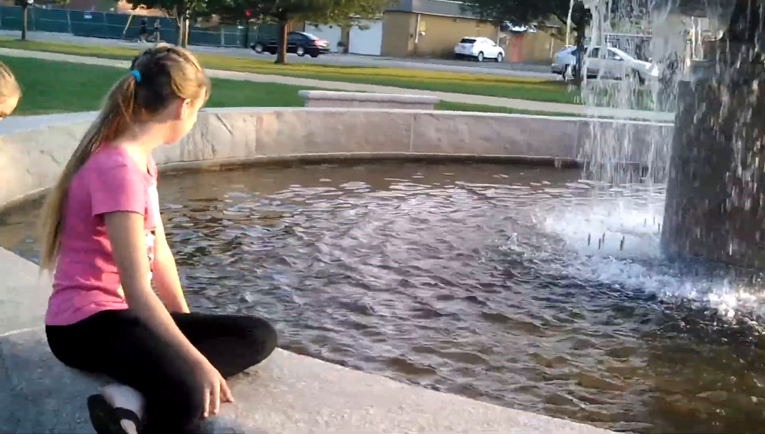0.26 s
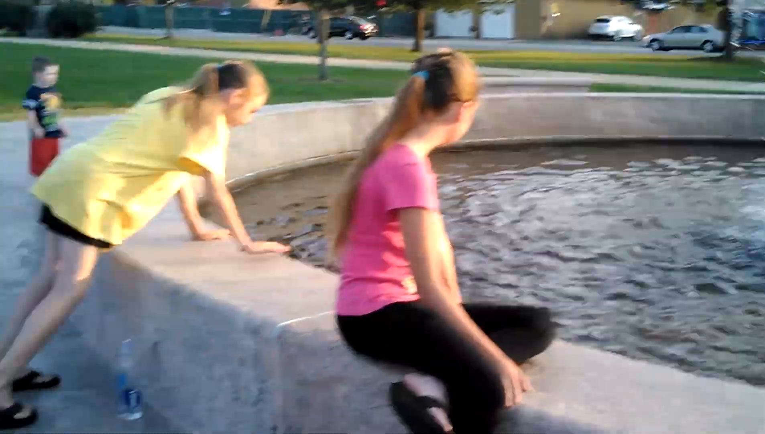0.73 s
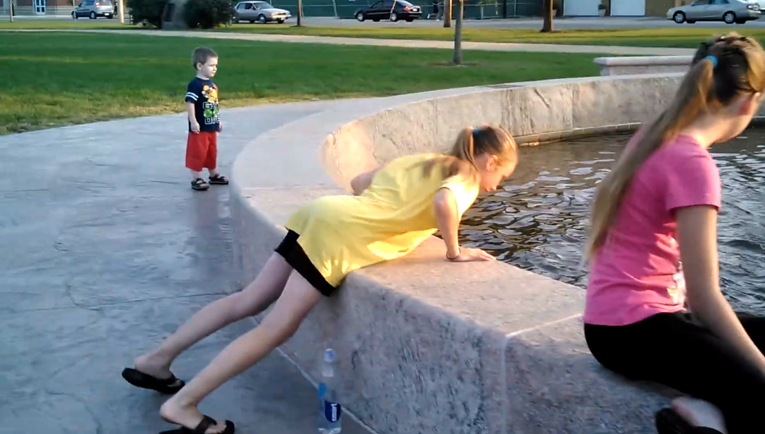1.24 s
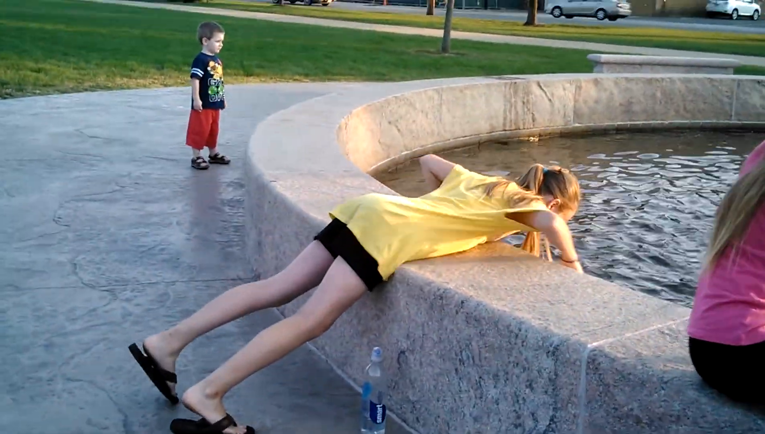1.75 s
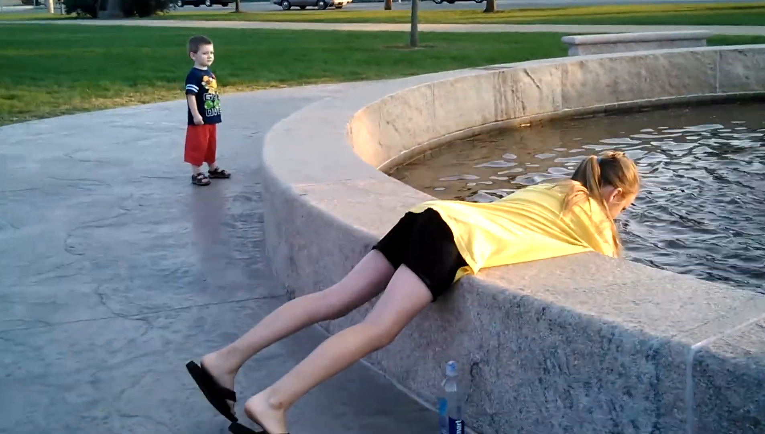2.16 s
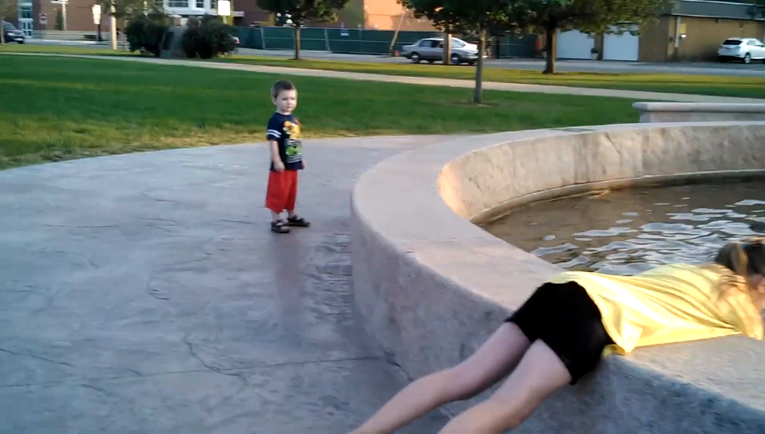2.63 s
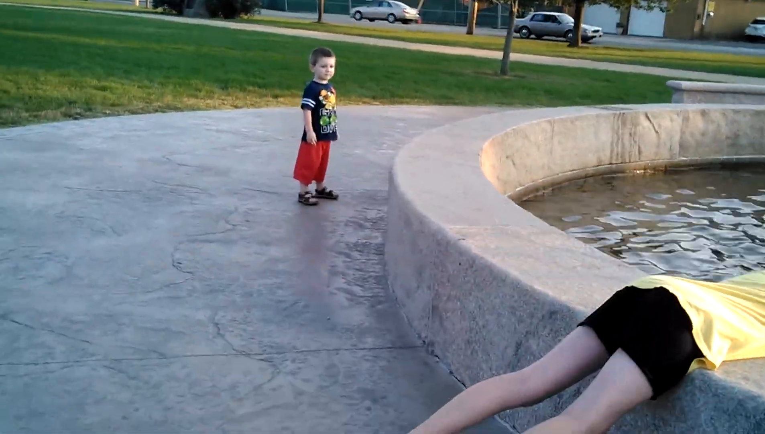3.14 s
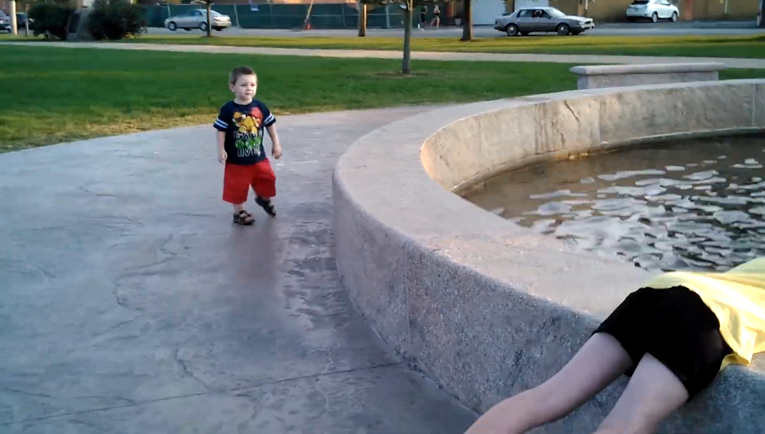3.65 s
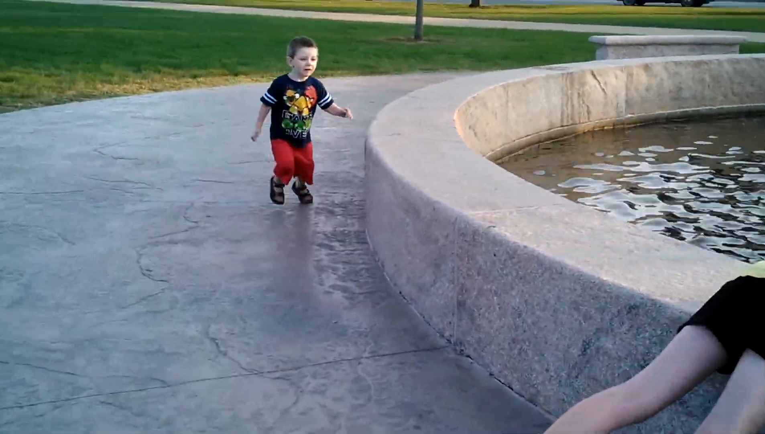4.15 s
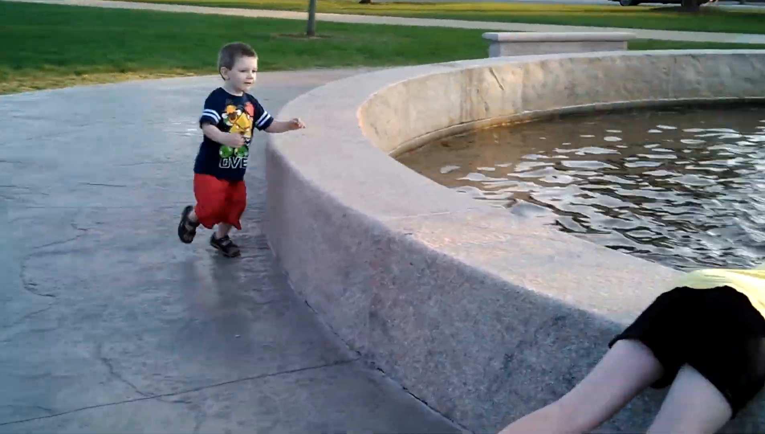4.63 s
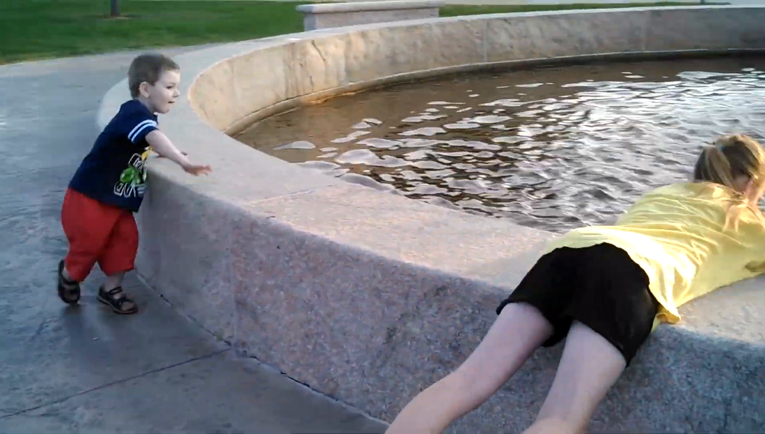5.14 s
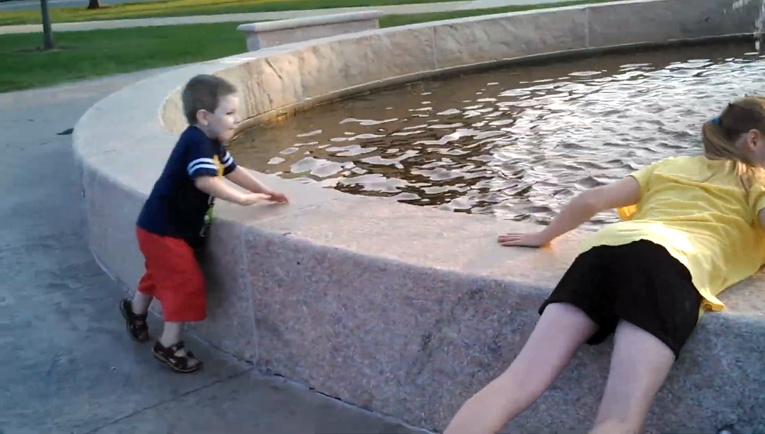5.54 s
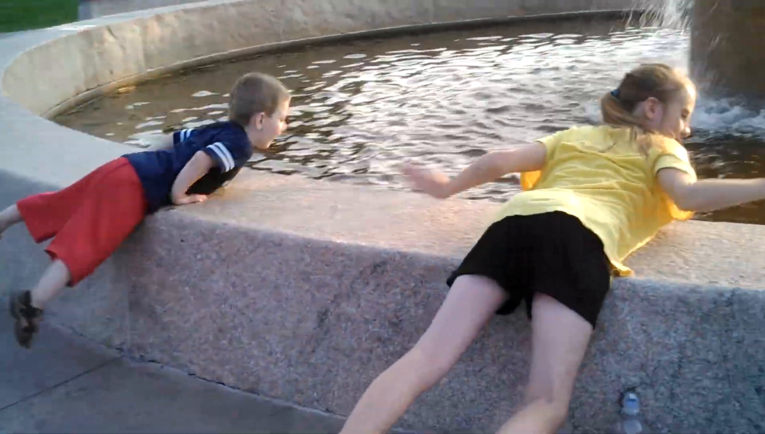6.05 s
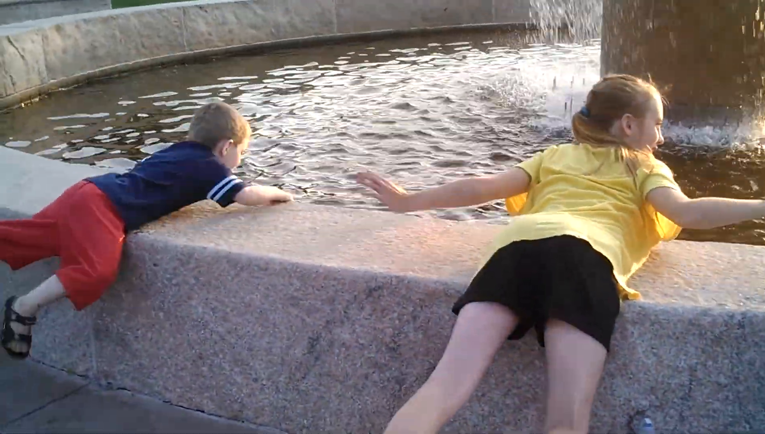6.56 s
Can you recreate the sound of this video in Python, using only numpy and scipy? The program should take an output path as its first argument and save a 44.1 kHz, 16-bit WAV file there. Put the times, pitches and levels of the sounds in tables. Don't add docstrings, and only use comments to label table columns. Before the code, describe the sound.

A continuous park fountain, heard outdoors from a few metres through a small handheld microphone. From 0 s, sheets of water fall into a stone basin: dense, bright spray hiss concentrated around 6 kHz, fine mist above and mid-range bubbling gurgle below, with small surges and split-second dips, notably near 1.9 s. Close drops slap and plop at 0.1, 0.2, 0.6 and 0.8 s, then irregularly. Low wind thumps are light at first, build from 2.1 s, hit hardest around 2.7-2.9 s and continue in lumps until about 4.6 s, while the water is slightly quieter. From 5 s the microphone turns towards the fountain; splashing comes forward and its treble shifts. A hard tick on stone comes at 5.5 s, then a quick pair at 6.2 s, the second louder. Wet drops and soft wind return near 6.5 s; water runs through the end at 6.8 s. Dry, almost mono, with slightly grainy, wide treble.

```python
import sys
import numpy as np
from scipy import signal
from scipy.fft import rfft, irfft, next_fast_len
from scipy.io import wavfile
from scipy.ndimage import uniform_filter1d, minimum_filter1d, map_coordinates

SR = 44100
rng = np.random.default_rng(int(sys.argv[2]) if len(sys.argv) > 2 else 0)


def magnitude_from_level(level_db):
    exponent = np.asarray(level_db, float) / 20
    return 10 ** exponent


def unload_wav(signal):
    wavfile.write(
        sys.argv[1],
        SR,
        np.round(np.clip(np.atleast_2d(signal).T, -1, 1) * 32767).astype(np.int16),
    )


N = 299439

# start_s, facing_0_to_1
FACING = [(0, 0.22), (2, 0.15), (4.5, 0.11), (4.9, 0.2), (5.3, 0.48), (5.7, 0.37), (6, 0.48), (6.79, 0.58)]


def unit(x):
    return x / np.sqrt(np.mean(x ** 2) + 1e-20)


def along(points, hz):
    point_hz, value = np.transpose(points)
    return np.interp(np.log(hz + 1), np.log(point_hz + 1), value)


def curves(rows):
    start_s, *columns = np.transpose(rows)
    t_s = np.arange(N) / SR
    return [np.interp(t_s, start_s, column) for column in columns]


def wobble(rate_hz):
    knots = rng.standard_normal(int(N * 200 / SR) + 4)
    return map_coordinates(knots, [np.arange(N) * min(rate_hz, 200) / SR])


def coloured(x, spectrum):
    size = next_fast_len(N + 8192)
    gain = magnitude_from_level(along(spectrum, np.fft.rfftfreq(size, 1 / SR)))
    return unit(irfft(rfft(x, size) * gain, size)[:N])


def turned(x, spectra):
    facing = np.clip(curves(FACING)[0], 0, 1)
    return (1 - facing) * coloured(x, spectra[0]) + facing * coloured(x, spectra[1])


def evened(x, size):
    power = np.abs(uniform_filter1d(x ** 2, size=size))
    return unit(x / (power + 0.05) ** 0.31)


def patchy(patchy_db):
    z = signal.stft(rng.standard_normal(N), nperseg=512)[2]
    field = uniform_filter1d(rng.standard_normal(z.shape), size=6, axis=0)
    field = uniform_filter1d(field, size=8, axis=1)
    return unit(signal.istft(z * magnitude_from_level(patchy_db * unit(field)), nperseg=512)[1][:N])


def bubbles(count, hz, spread, cycles, size_db):
    when = rng.random(count)
    size = np.minimum(rng.exponential(size=count), 6)
    pitch_hz = np.clip(hz * np.exp(spread * rng.standard_normal(count)), 300, 16000)[:, None]
    turns = pitch_hz * np.arange(400) / SR
    rings = np.sin(2 * np.pi * turns * (1 + 0.037 * turns / cycles)) * np.exp(-turns / cycles)
    rings *= magnitude_from_level(size_db * size)[:, None] * np.sqrt(pitch_hz)
    index = (when * N).astype(int)[:, None] + np.arange(400)
    return unit(np.bincount(index.ravel(), rings.ravel(), N + 400)[:N])


def drops(count, size_db):
    when = rng.random(count)
    size = rng.exponential(size=count)
    sign = rng.choice([-1, 1], count)
    return unit(np.bincount((when * N).astype(int), sign * magnitude_from_level(size_db * size), N))


def fountain():
    # start_s, fall_db, mist_drift_db
    flow = [(0, -11, -1), (.3, -12, -2.5), (.65, -11, 0), (1.05, -13, -3), (1.3, -12.5, 1),
            (1.65, -11.5, 0.5), (2.1, -12.5, 1), (2.5, -14.5, 3), (2.85, -13.5, .5), (3.1, -14.5, -3),
            (3.45, -14.5, 3.5), (3.85, -15, -1), (4.4, -13, 0), (5.0, -13, .5), (5.3, -11, -0.5),
            (5.8, -12, 1), (6.25, -13, -3), (6.79, -12.5, -1.5)]
    # middle_s, depth_db
    tears = [(.11, 3), (.26, 2), (1.14, -1), (1.53, 5), (1.8, 6), (1.9, 13), (2.46, 0), (2.53, 4),
             (2.59, 6), (2.99, 4), (3.16, 0), (3.25, 3), (3.37, 3), (3.46, 6), (4.01, 0), (5.01, 5),
             (5.57, 10.5), (5.67, 5), (5.99, 5), (6.05, 5), (6.13, 6), (6.33, 6)]
    # pitch_hz, density_db_per_hz
    gurgle_spectra = [
        [(160, -42), (280, -16), (447, -7.5), (490, -10.5), (623, -4.5), (1340, -4), (1670, -5), (2460, -1.5), (4300, -8), (5590, -17), (9460, -120)],
        [(160, -37), (280, -8.5), (974, -5), (1250, -4.5), (2150, -2.5), (3430, -10), (3620, -33), (4200, -24), (5460, -36), (9240, -120)],
    ]
    # pitch_hz, density_db_per_hz
    port_spectra = [
        [(2290, -37.5), (3900, -35), (4510, -20.5), (5540, -3.5), (6080, 3), (8200, -15), (10700, -30), (18000, -120)],
        [(2290, -74), (3900, -32), (4220, -19), (4990, -6.5), (6030, 0), (6530, -1), (7290, -20), (8200, -31), (10700, -38), (18000, -120)],
    ]
    # pitch_hz, density_db_per_hz
    mist_spectra = [
        [(4410, -18), (7500, -2), (9080, -3.5), (9810, -11.5), (10900, -31), (11900, -36), (15500, -53), (22000, -120)],
        [(4410, -25), (7500, -1.5), (8550, -4), (8940, -12), (10200, -6.5), (11900, -11.5), (15500, -42), (22000, -120)],
    ]
    # pitch_hz, density_db_per_hz
    fine_spectrum = [(10500, -40), (11700, -14), (12500, -5), (13400, 0), (14400, 0), (14800, -90)]

    fall_db, drift_db = curves(flow)
    swing_db = fall_db - fall_db.mean()
    facing = curves(FACING)[0]
    t_s = np.arange(N) / SR

    gurgle_db = -25 + 0.63 * swing_db - 4.5 * facing - 0.36 * drift_db + 0.54 * wobble(9)
    mist_db = -23 + 0.2 * swing_db - 12 * facing + 0.5 * drift_db + 1.35 * wobble(28)
    fine_db = -35 + 0.6 * swing_db + 6.5 * facing + drift_db
    spray_db = fall_db + 0.23 + 0.24 * wobble(28)
    tear_half_s, tear_share = 0.011, 0.74
    for middle_s, depth_db in tears:
        spray_db -= tear_share * depth_db * np.exp(-((t_s - middle_s) / tear_half_s) ** 2)
    surge_db = 0.17 * wobble(12) + 0.12 * wobble(35)

    impacts = drops(count=16000, size_db=2.5)
    rings = bubbles(count=7000, hz=1524, spread=0.582, cycles=3.3, size_db=2.5)
    gurgle = turned(patchy(patchy_db=1.6) + magnitude_from_level(-10.5) * rings + magnitude_from_level(-5) * impacts, gurgle_spectra)
    spray = turned(patchy(patchy_db=1.0) + magnitude_from_level(-6.5) * impacts, port_spectra)
    mist = turned(patchy(patchy_db=0.3) + impacts, mist_spectra)
    fine = coloured(patchy(patchy_db=0.0) + magnitude_from_level(-21) * impacts, fine_spectrum)

    gurgle *= magnitude_from_level(gurgle_db + 0.18 * surge_db)
    spray *= magnitude_from_level(spray_db + 0.36 * surge_db + 0.15 * wobble(25))
    mist *= magnitude_from_level(mist_db + 0.64 * surge_db + 0.81 * wobble(21.92))
    fine *= magnitude_from_level(fine_db + 0.4 * surge_db + 1.3 * wobble(30))
    return gurgle + spray + mist + fine


def wind():
    # start_s, breeze_db
    breeze = [(0, -40), (.8, -40.5), (1.3, -37), (1.9, -39.5), (2.4, -38), (2.9, -28), (3.5, -35.5),
              (4.0, -35), (4.7, -39.5), (5.3, -40), (5.8, -36), (6.2, -37), (6.79, -36.5)]
    # middle_s, length_s, slow_eddies_db, sharp_eddies_db
    gusts = [(0.037, 0.024, -30, -34.5), (.11, .04, -31, -32.5), (.43, 0.049, -37, -37),
             (0.667, 0.023, -36, -44), (0.917, .06, -33, -36.5), (1.112, .04, -31, -54),
             (1.203, 0.036, -30.5, -38), (1.587, .06, -31, -48), (2.107, 0.044, -32, -40),
             (2.189, .04, -33, -28), (2.256, 0.063, -26, -28), (2.368, 0.12, -27, -28),
             (2.46, .05, -27, -29.5), (2.558, 0.14, -28, -25.5), (2.681, 0.076, -22.5, -22),
             (2.767, 0.086, -23, -15.5), (2.87, 0.077, -28, -17), (2.955, .05, -23, -23),
             (3.12, 0.096, -31, -32), (3.24, 0.12, -29, -31.5), (3.46, 0.1, -28.5, -31.5),
             (3.6, 0.12, -27, -33.5), (3.81, 0.053, -30, -37), (3.96, 0.11, -29, -36),
             (4.065, 0.096, -22.5, -31), (4.3, .07, -27, -29), (4.398, 0.087, -25, -31.5),
             (4.58, 0.07, -30, -37.5), (6.5, 0.16, -32, -35.5), (6.74, 0.11, -28, -47)]
    # pitch_hz, density_db_per_hz
    slow_spectrum = [(15, -70), (28, -44), (38, -12), (48, -8), (70, 1.5), (110, -4.5), (170, -21.5),
                     (400, -80)]
    # pitch_hz, density_db_per_hz
    sharp_spectrum = [(60, -52), (120, 2.5), (190, -3.5), (300, -13.5), (500, -22.5), (1000, -72)]

    rise_s, tail_s = 0.013, 0.023
    breeze_db = curves(breeze)[0]
    t_s = np.arange(N) / SR
    slow_gain = magnitude_from_level(breeze_db + wobble(12))
    sharp_gain = magnitude_from_level(breeze_db - 4.5 + wobble(12))
    for middle_s, length_s, slow_db, sharp_db in gusts:
        beyond_s = np.maximum(np.abs(t_s - middle_s) - length_s / 4, 0)
        edge_s = np.where(t_s < middle_s, rise_s, tail_s) + length_s / 8
        lump = np.exp(-(beyond_s / edge_s) ** 2)
        slow_gain = np.hypot(slow_gain, magnitude_from_level(slow_db) * lump)
        sharp_gain = np.hypot(sharp_gain, magnitude_from_level(sharp_db) * lump)
    slow = evened(coloured(rng.standard_normal(N), slow_spectrum), size=2000)
    sharp = evened(coloured(rng.standard_normal(N), sharp_spectrum), size=1500)
    return magnitude_from_level(0.7 * wobble(25)) * (slow_gain * slow + sharp_gain * sharp)


def slaps():
    # start_s, peak_db, bubble_hz, bubble_db, crack_db
    near_drops = [(0.0919, -1, 1550, 2, -20), (0.1135, -3, 1350, 2, -16), (0.1983, -1, 1020, 1.5, -21),
                  (0.6074, 0, 1370, 0, -16), (0.821, -11, 1340, 7, -26), (1.2912, -14, 2420, -3, -10),
                  (1.4691, -13, 2500, 1, -10), (2.026, -6.5, 1580, 4, -21), (2.09, -8.5, 1690, -3, -9),
                  (2.183, -3.5, 2270, 2, -26), (3.104, -9.5, 2190, -1, -9), (3.536, -10, 2490, 3, -15),
                  (3.9697, -7, 3170, -7, -13), (4.371, -3.5, 1130, -7, -14), (4.4757, -14, 3100, 1, -11),
                  (4.8813, -7.5, 2210, 0, -14), (5.165, -11, 1660, -1, -13), (5.249, -2, 1690, 1, -22),
                  (6.416, -2.5, 1300, -1.5, -20), (6.5031, -6, 1640, 0, -19)]

    t_s = np.arange(2000) / SR
    out = np.zeros(N + len(t_s))
    u = (t_s - 0.0012) / 0.00007
    spike = (1 - u * u) * np.exp(-u * u / 2)
    for start_s, peak_db, bubble_hz, bubble_db, crack_db in near_drops:
        ring = np.sin(2 * np.pi * bubble_hz * t_s * (1 + 9 * t_s))
        ring *= magnitude_from_level(bubble_db - 60 * t_s / 0.0087) * (1 - np.exp(-t_s / 0.0013))
        spatter = signal.lfilter([0.45], [1, -0.6], rng.standard_normal(len(t_s)))
        spatter *= 0.52 * magnitude_from_level(-60 * t_s / 0.04)
        slap = ring + magnitude_from_level(crack_db + 10.5) * (spike + spatter)
        out[round(start_s * SR):][:len(t_s)] += magnitude_from_level(peak_db) * slap
    return out[:N]


def ticks():
    # start_s, peak_db, width_ms, ring_db, ring_hz
    contacts = [
        (5.5437, -.5, .06, -17, 3000),
        (6.1772, -5, .055, -10, 1400),
        (6.2067, 1.5, .065, -17, 650),
    ]

    t_ms = np.arange(900) / SR * 1000
    out = np.zeros(N + len(t_ms))
    after_ms = np.maximum(t_ms - 1.3, 0)
    for start_s, peak_db, width_ms, ring_db, ring_hz in contacts:
        u = (t_ms - 1.3) / width_ms
        spike = (1 - 0.5 * u * u) * np.exp(-u * u / 2)
        rebound = -0.26 * np.exp(-((u - 3) / 2) ** 2)
        ring = np.cos(2 * np.pi * ring_hz * after_ms / 1000) * (after_ms > 0)
        ring *= magnitude_from_level(ring_db - 60 * after_ms / 12)
        spatter = signal.lfilter([0.45], [1, -0.6], rng.standard_normal(len(t_ms)))
        spatter *= 0.2 * magnitude_from_level(-60 * t_ms / 18)
        tick = spike + rebound + ring + spatter
        out[round(start_s * SR):][:len(t_ms)] += magnitude_from_level(peak_db + 2) * tick
    return out[:N]


def scene():
    return np.tile(fountain() + wind() + slaps() + ticks(), (2, 1))


def noise_swap(x):
    # band_hz, share_of_frames
    swap_share = [(4359, 0.03), (5344, 0.1), (6516, 0.32), (7875, 0.56), (9375, 0.57), (10875, 0.44),
                  (12375, 0.62), (13875, 0.61)]
    edges = np.array([176, 196, 216, 240, 264, 292, *range(320, 609, 32)])

    frame = 941
    window = signal.windows.kaiser_bessel_derived(2 * frame, 4 * np.pi)
    z = signal.stft(x, window=window, nperseg=2 * frame)[2]
    fresh = signal.stft(rng.standard_normal(x.shape), window=window, nperseg=2 * frame)[2]

    luck = rng.standard_normal((len(edges), z.shape[2] + 1))
    luck = luck[1:] + luck[:-1]
    luck = unit(luck[:, 1:] - 0.15 * luck[:, :-1])

    out = np.where(np.arange(z.shape[1])[:, None] < edges[-1], z, 0)
    loud = uniform_filter1d(np.abs(z), size=13, axis=1) > magnitude_from_level(-67)
    for lo, hi, row in zip(edges, edges[1:], luck):
        share = 0.72 * along(swap_share, (lo + hi) * SR / (4 * frame))
        swap = 1 / (1 + np.exp(-1.7 * row)) < share
        band, noise = z[:, lo:hi], fresh[:, lo:hi]
        level = np.linalg.norm(band, axis=1) / (np.linalg.norm(noise, axis=1) + 1e-12)
        out[:, lo:hi] = np.where(swap, magnitude_from_level(0.03) * level[:, None] * noise, band)
        out[:, lo:hi] *= swap | loud[:, lo:hi]
    return signal.istft(out, window=window, nperseg=2 * frame)[1][:, :N]


def band_limit(x):
    return signal.sosfilt(signal.butter(12, 15010, fs=SR, output="sos"), x)


def record(dry):
    eased = dry / (1 + np.abs(dry / 1.05) ** 5) ** (1 / 5)
    swapped = noise_swap(eased)
    room_left = np.minimum(1, 1.02 / (np.abs(swapped).max(0) + 1e-9))
    gain = uniform_filter1d(minimum_filter1d(room_left, size=90), size=90)
    return band_limit(swapped * gain)


dry = scene()
out = record(dry)
unload_wav(out)
```